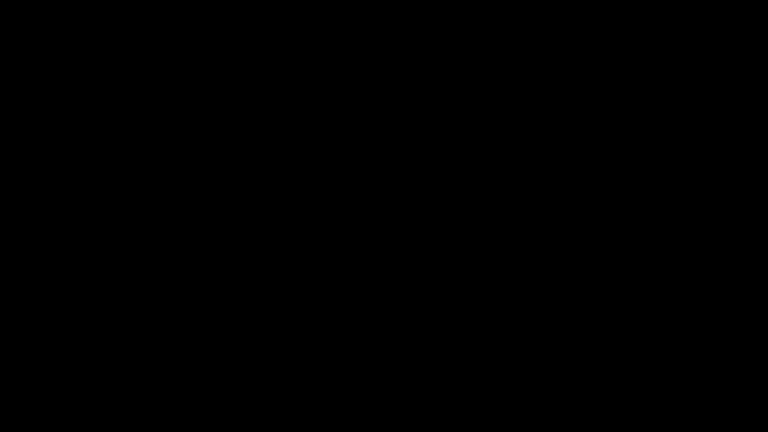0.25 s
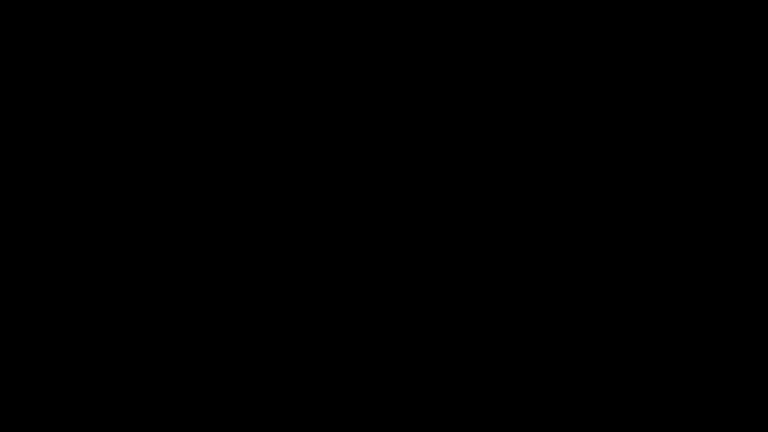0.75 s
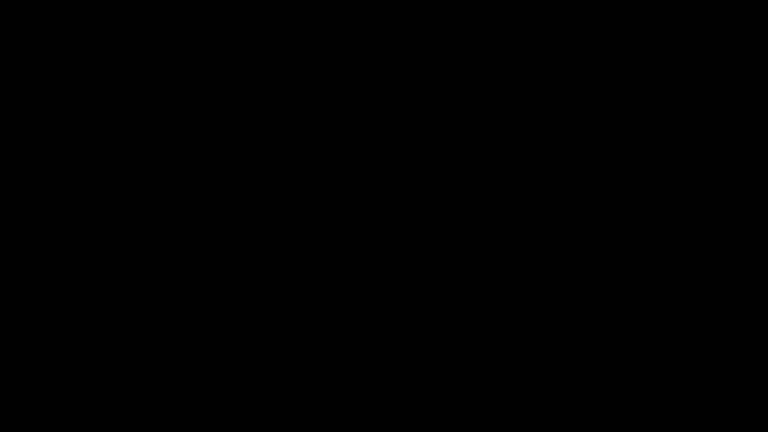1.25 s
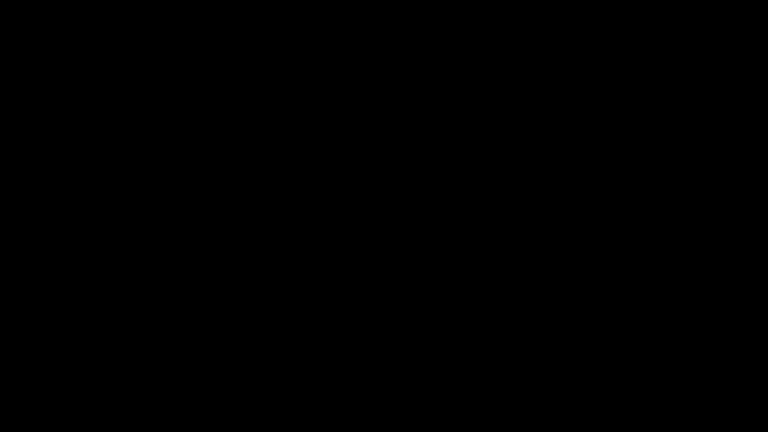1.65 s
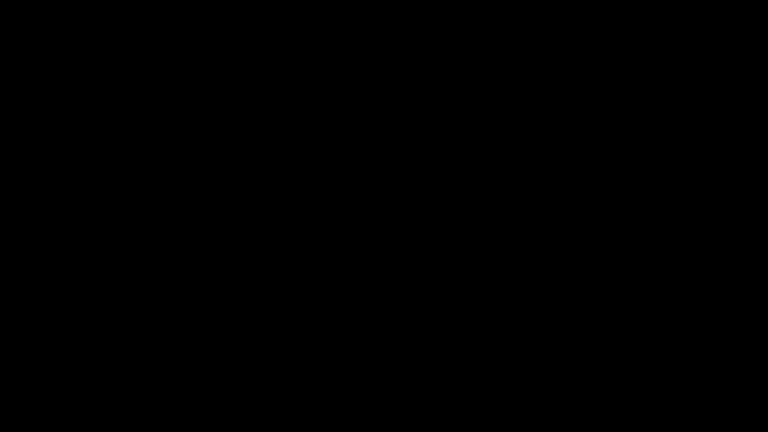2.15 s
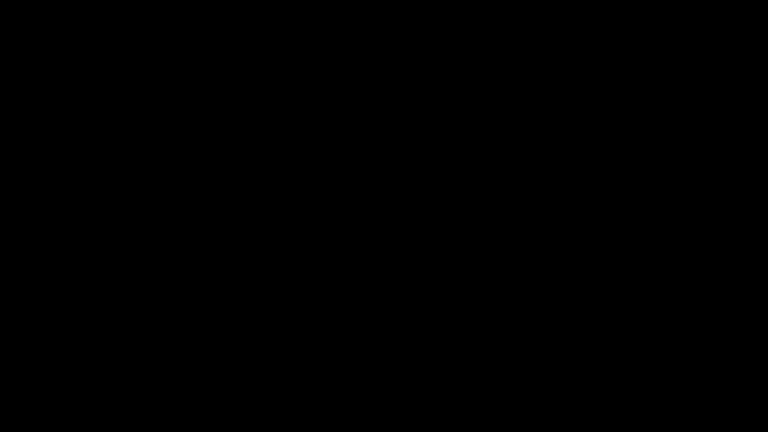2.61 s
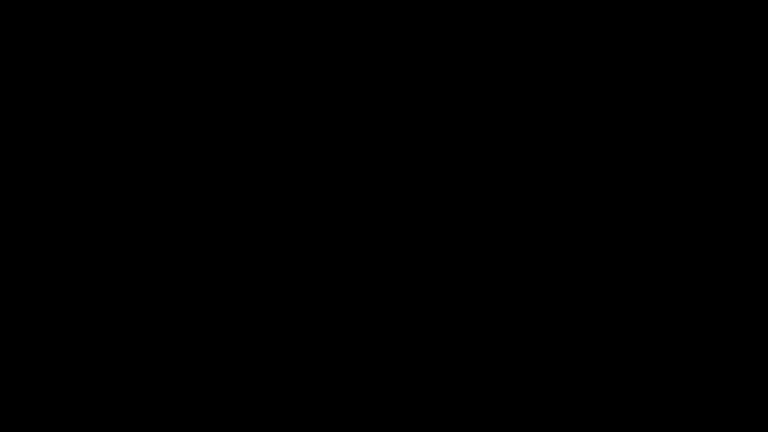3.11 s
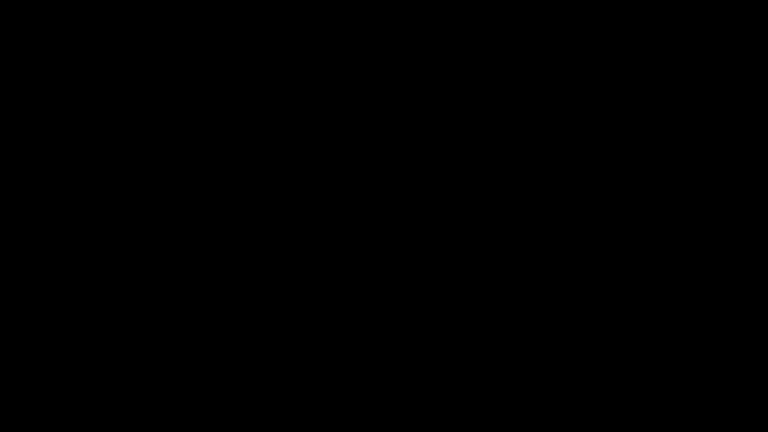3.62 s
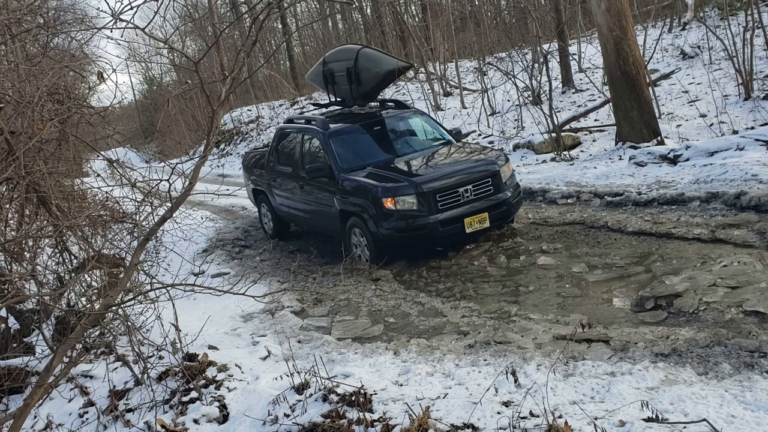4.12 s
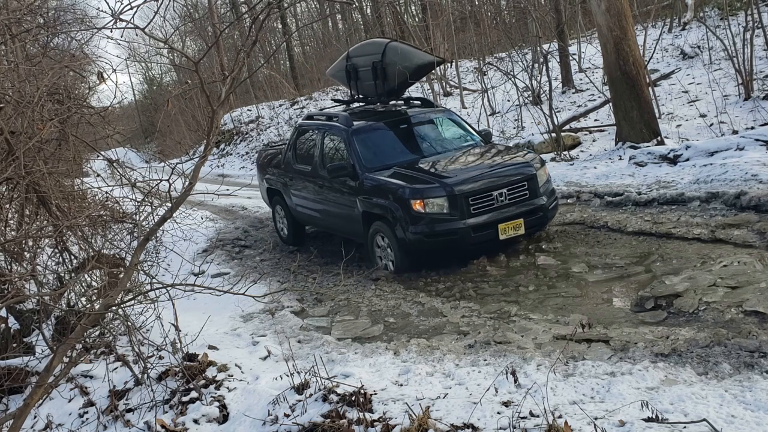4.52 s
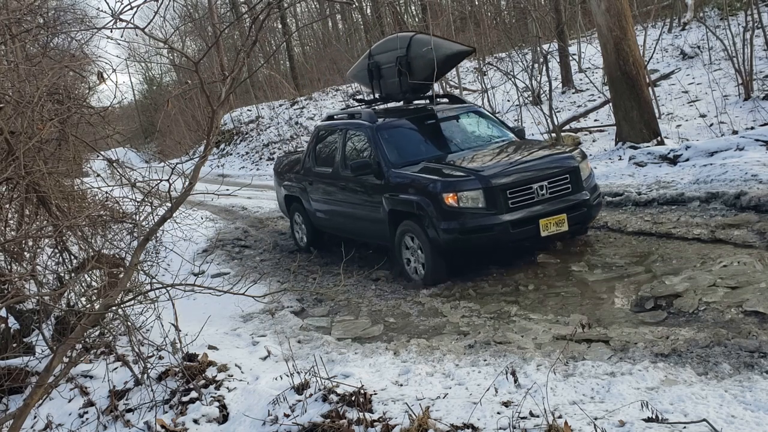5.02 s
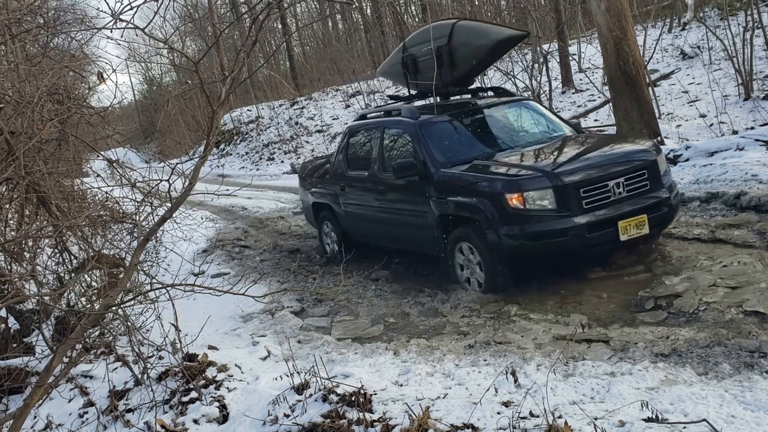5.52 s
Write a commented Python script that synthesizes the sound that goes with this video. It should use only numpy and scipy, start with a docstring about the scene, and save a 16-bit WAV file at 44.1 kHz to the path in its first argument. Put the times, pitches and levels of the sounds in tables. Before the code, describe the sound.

Outdoors on a snowy forest trail, a pickup rolls slowly through a frozen, muddy puddle. Quiet creaking ticks of ice come first, then clustered hollow knocks and crunching rubble, a brief lull, a sharp bright slab burst, more grinding, a dense heavy break, and finally sloshing splashes. Low rumble underneath. Close, dry stereo microphones, with a slight drift from left to right.

```python
"""Tyres grind ice rubble as dull knocks and sharp snaps ring out close to a microphone pair on a forest trail:
a pickup creeps through a frozen, muddy puddle, passing from left to right.
Ice plates knock with aftershocks, splinters snap as bright noise bursts, thin shards ping in a narrow band.
Clumped clicks and noise make rubble and slush, short rising rings make bubbles, noise puffs make splashes.
Engine and heavy body rumble underneath as low noise; a faint low hum swells and fades after heavy knocks."""
import sys
import numpy as np
from scipy import signal
from scipy.fft import rfft, irfft, next_fast_len
from scipy.io import wavfile
from scipy.ndimage import map_coordinates

SR = 44100
rng = np.random.default_rng(int(sys.argv[2]) if len(sys.argv) > 2 else 0)


def digitize_waveform(pressure):
    """Quantize a signal to 16-bit integers and store it at the path in sys.argv[1].

    Rows of a 2-D input are taken as channels; values are limited to [-1, 1].
    """
    field = np.atleast_2d(pressure).T
    bounded = np.clip(field, -1, 1)
    quanta = np.round(bounded * 32767).astype(np.int16)
    wavfile.write(sys.argv[1], SR, quanta)


N = 253575

# Tyre work. Each row: time in seconds, grinding of rubble in dB, slush hiss in dB.
TYRE_WORK = [(0.0, -52.5, -68), (0.34, -46, -62), (0.68, -53, -65.5), (0.76, -36.5, -55.5),
             (0.86, -46, -55.5), (1.0, -43.5, -53.5), (1.25, -42, -55.5), (1.75, -38, -52),
             (2.1, -44.5, -56.5), (2.17, -46.5, -61), (2.64, -38.5, -51.5), (2.99, -54, -52),
             (3.2, -46, -50), (3.4, -42, -49.5), (3.46, -41, -50), (3.84, -41.5, -46.5),
             (3.91, -31.5, -40.5), (4.53, -37, -39.5), (4.85, -39, -42), (5.29, -33, -37.5),
             (5.61, -31, -34), (5.75, -35, -35)]
# What the tyres work through. Each row: time in seconds, fine spray over slush hiss in dB,
# brittleness (gain of the upper rubble) in dB.
FOOTING_MAKEUP = [(0, -7.5, -1.5), (.6, -1, 0), (1.7, -3, -14), (2.3, -1.5, -12.5), (2.9, -6.5, 7),
                  (3.5, -6.5, -3), (4.3, -9, 1.5), (5.3, -11.5, -1), (5.75, -8.5, -4)]
# Splashes and thick slabs crushed under a wheel. Each row: start in seconds, length in seconds,
# grinding in dB, slush hiss in dB.
WHEEL_SURGES = [(2.886, 0.14, -80, -49.5), (3.24, 0.092, -24.5, -30), (3.375, 0.019, -41, -41),
                (4.534, 0.072, -19.5, -34.5), (4.603, 0.029, -36, -30.5), (4.659, 0.017, -22.5, -28),
                (5.248, 0.02, -55, -42), (5.465, 0.071, -38, -42.5), (5.703, 0.063, -40, -38)]
# Colour of ground rubble. Each row: frequency in Hz, relative level in dB per Hz.
RUBBLE_COLOUR = [(59, -10.5), (100, -5.5), (155, -3.5), (337, 3.5), (374, -2), (559, 0), (687, -2.5),
                 (1070, -1), (1740, -19), (2200, -25), (2860, -74), (4840, -120)]
# Colour of slush hiss. Each row: frequency in Hz, relative level in dB per Hz.
SLUSH_COLOUR = [(880, -8.5), (1500, -5.5), (1760, -16), (2500, -8.5), (3400, -13.5), (5000, -14),
                (7000, -19.5), (9000, -28.5)]
# Colour of fine spray. Each row: frequency in Hz, relative level in dB per Hz.
SPRAY_COLOUR = [(3000, -6), (6500, 0), (7800, 2), (9000, -1.5), (12000, -0.5), (16000, -3.5)]
# Engine and ground rumble. Each row: time in seconds, level in dB.
RUMBLE_LEVEL = [(0, -57.5), (.7, -54), (.96, -41), (1.2, -55), (1.8, -45), (2.1, -51), (3.0, -52),
                (3.28, -38), (3.8, -50), (3.92, -38), (5.0, -39.5), (5.75, -33.5)]
# Colour of the rumble. Each row: frequency in Hz, relative level in dB per Hz.
RUMBLE_COLOUR = [(13, -72), (22, -10), (70, 5.5), (200, -5), (260, -11), (440, -120)]
# Low hum swelling and fading after heavy knocks. Each row: start in seconds, nominal level in dB,
# fade in dB per second.
HUM_SWELLS = [(.96, -41, 35), (2.18, -52, 15)]
# Ice plates breaking. Each row: time in seconds, nominal level in dB, pitch in Hz,
# aftershocks relative to that level in dB.
PLATE_BREAKS = [(0.056, -42, 840, 6), (0.176, -35, 315, -6), (0.219, -28, 417, -6.5),
                (0.278, -37, 700, -15), (0.317, -32.5, 323, 4), (0.35, -33.5, 750, -0.5),
                (0.381, -30, 320, -8), (0.461, -30.5, 323, -10), (0.487, -31, 485, -7),
                (0.537, -34.5, 373, -7), (0.688, -33, 394, -0.5), (0.716, -35, 860, -2),
                (0.773, -27, 320, -7), (0.795, -27, 407, -13), (0.807, -20, 624, -10),
                (0.883, -15.5, 347, -7.5), (0.942, -10, 322, -11), (0.977, -19.5, 367, -8.5),
                (1.081, -30.5, 724, -3.5), (1.224, -29, 322, -11), (1.433, -18, 505, -5.5),
                (1.583, -25.5, 505, -22), (1.612, -29.5, 464, 7), (1.624, -12.5, 570, -6.5),
                (1.761, -25, 380, -23), (1.796, -23.5, 403, 3), (1.833, -25, 527, 2),
                (1.992, -19.5, 505, -4), (2.035, -19.5, 450, -6), (2.067, -29, 283, 1.5),
                (2.088, -26.5, 457, 1), (2.104, -28, 382, -1), (2.199, -19, 370, -5),
                (2.268, -27.5, 335, -1.5), (2.293, -24, 330, -4), (2.362, -27.5, 416, -10),
                (2.448, -22.5, 410, -0.5), (2.488, -31.5, 323, 4.5), (2.547, -31, 584, 3),
                (2.648, -41, 297, 9), (2.685, -35, 292, -6), (2.893, -30, 805, -8), (3.161, -36, 207, -7),
                (3.23, -18.5, 410, 0), (3.254, -10.5, 410, -7), (3.271, -9.5, 875, -7),
                (3.288, -14, 900, -11), (3.294, -27, 940, -11), (3.316, -15.5, 740, -5),
                (3.324, -12, 350, -4), (3.381, -18, 850, -2), (3.409, -25, 600, -5),
                (3.674, -24.5, 506, -2), (3.719, -12.5, 593, -26), (3.883, -18.5, 574, -6.5),
                (3.979, -10.5, 465, -11.5), (4.5, -26.5, 1010, 6), (4.541, -18, 490, -14),
                (4.559, -12.5, 720, -8), (4.584, -6, 510, -9), (4.593, -5.5, 700, -17),
                (4.615, -12, 450, -21), (4.624, -6, 900, -5), (4.669, -15, 690, -9),
                (4.675, -16.5, 930, -10), (4.768, -23, 640, 2), (5.18, -24.5, 590, 1.5),
                (5.19, -25, 444, -17), (5.683, -22, 432, -5), (5.722, -19, 595, 2)]
# Splinters snapping. Each row: time in seconds, nominal level in dB, fine spray over hiss in dB.
SPLINTER_SNAPS = [(0.088, -44, -13), (0.22, -51, 1), (0.352, -50, -1), (0.584, -48, 16), (0.772, -37.5, -7),
                  (0.807, -41, -10), (0.886, -37.5, -12), (0.949, -31, -5), (1.005, -38, -4),
                  (1.082, -56, -6), (1.226, -37, 1), (1.307, -41, 1), (1.344, -41, 0), (1.369, -35.5, -6),
                  (1.4096, -35, -3), (1.564, -43, -6), (1.615, -37, 3), (1.631, -30, -7), (1.68, -44, 16),
                  (1.798, -44, 13), (1.838, -32, 1), (1.864, -33, 3), (1.9403, -36.5, -14),
                  (1.993, -35.5, -4), (2.0677, -42.5, 12), (2.136, -42, -8), (2.201, -38, 0),
                  (2.2682, -36, -2), (2.293, -36.5, -1), (2.453, -42, -9), (2.482, -37.5, -6),
                  (2.887, -37, 19), (2.916, -37.5, 20), (3.168, -33.5, -7), (3.2326, -27.5, -13),
                  (3.2575, -39, -9), (3.272, -22, 7), (3.2874, -15.5, -2), (3.326, -19, 8),
                  (3.382, -22.5, 1), (3.898, -28, -9), (4.394, -30, -4), (4.544, -25.5, -17),
                  (4.584, -17, -10), (4.63, -19.5, -15), (4.705, -20, -6), (5.18, -27, -11),
                  (5.476, -34, -2)]
# Splashes thrown up by the tyres. Each row: time in seconds, nominal level in dB, pitch in Hz.
TYRE_SPLASHES = [(1.305, -41, 2680), (1.414, -42, 2830), (1.765, -43, 2820), (2.893, -38, 2730),
                 (2.95, -39, 2600), (3.292, -38, 2700), (4.884, -36, 2330), (5.035, -31, 2340),
                 (5.256, -31, 2920), (5.285, -29, 3180), (5.417, -25, 2460), (5.459, -22.5, 2450)]
# Thin shards that ping as a slab bursts. Each row: time in seconds, nominal level in dB.
SHARD_PINGS = [(3.233, -27), (3.258, -14), (3.383, -26)]
# Passage across the pair. Each row: time in seconds, lag of left behind right in samples.
LEFT_LAG = [(0, -5.5), (1.7, -3.5), (2.6, -0.5), (3.7, 2), (5.75, 5.5)]
# Sound common to both microphone ports. Each row: frequency in Hz, shared share of power.
PORT_LIKENESS = [(60, 0.94), (700, 0.99), (1300, 0.85), (2400, 0.38), (4400, 0.59), (8000, 0.19),
                 (15000, 0.16)]
# Difference in port colour. Each row: frequency in Hz, left minus right in dB.
PORT_COLOUR = [(60, 5), (200, 4.5), (600, 2.5), (1300, 4), (2400, -1), (4400, .5), (8000, 1), (15000, 0)]

BRITTLE_HZ = 800   # brittleness acts above this
BUBBLES_DB, GURGLE_DB = -17.5, -11   # relative to slush hiss, relative to grinding
SURGE_ATTACK_S, SURGE_SAG_DB, SURGE_RELEASE_S = 0.022, 3, 0.029
SURGE_FINE_DB = -8.5   # fine spray relative to slush hiss
HUM_HZ, HUM_ATTACK_S = 191, 0.094   # pitch about which the hum wavers
THUMP_HZ, THUMP_DB, THUMP_DB_PER_OCTAVE = 145.5, -13, -13   # ground push, stronger under deep plates
FRONT_HZ, FRONT_DB = 1026, -13.5   # brittle front of every break
RING_CYCLES, RING_S = 0.38, 0.00059   # small high plates swing a little more often
OVERTONE, OVERTONE_DB = 2.066, -15   # second swing, as a multiple of the plate's pitch
PLATE_TOP_HZ = 1370   # the plates give little above this
SNAP_S = 0.0056   # decay time
SPLASH_S, SPLASH_WIDTH = 0.0083, 0.14   # decay time; half bandwidth as a share of the pitch
SHARD_HZ, SHARD_HALF_WIDTH_HZ, SHARD_S = 6420, 450, 0.0009   # centre, half bandwidth, decay time
CUTOFF_HZ = 15830


def from_db(db):
    """Decibels to an amplitude factor."""
    return 10 ** (np.asarray(db) / 20)


def rms_one(x):
    """Scale to an rms of 1."""
    return x / np.sqrt(np.mean(x ** 2) + 1e-20)


def in_time(rows):
    """Join a table's rows by straight lines over time, one curve a column."""
    s, *columns = np.transpose(rows)
    return np.array([np.interp(np.arange(N) / SR, s, c) for c in columns])


def since(s):
    """Seconds elapsed since time s, zero before it."""
    return np.maximum(np.arange(N) / SR - s, 0)


def at_hz(points, hz):
    """Read a spectrum table along log frequency."""
    hz_points, values = np.transpose(points)
    return np.interp(np.log(hz), np.log(hz_points), values)


def filtered(x, gain_at):
    """Multiply each frequency by gain_at(Hz)."""
    size = 2 * next_fast_len(N // 2 + 1)
    hz = np.maximum(np.arange(size // 2 + 1) * SR / size, 1)
    return irfft(rfft(x, size) * gain_at(hz), size)[..., :N]


def coloured(streams, spectrum):
    """The spectrum on all streams, in minimum phase so that a click rings only after it; rms 1."""
    def causal(hz):
        cepstrum = irfft(np.log(from_db(at_hz(spectrum, hz))))
        # fold the cepstrum onto positive time
        cepstrum[1:len(hz) - 1] *= 2
        cepstrum[len(hz):] = 0
        return np.exp(rfft(cepstrum))
    return rms_one(filtered(streams, causal))


def add(out, s, sound):
    """Mix a sound in at time s, cut at the end."""
    at = min(max(round(s * SR), 0), N)
    out[..., at:at + sound.shape[-1]] += sound[..., :N - at]


def drift(rate):
    """Slow random wander of spread 1: noise through a two-pole lowpass near rate Hz."""
    pole = np.exp(-40 * np.pi * rate / SR)   # runs at every 20th sample
    noise = rng.standard_normal(N // 20 + 2002)
    slow = signal.lfilter([1], [1, -2 * pole, pole * pole], noise)[2000:]
    return np.interp(np.arange(N) / 20, np.arange(len(slow)), rms_one(slow))


def grains(per_s, spread_db, clump_db, clump_rate, smooth):
    """Three unrelated streams of random clicks that come in shared clumps, on a share of smooth noise."""
    clumps = from_db(clump_db * drift(clump_rate) + .5 * clump_db * drift(4 * clump_rate))
    sizes = from_db(spread_db * np.minimum(rng.exponential(1, (3, N)), 5))
    signs = rng.choice([-1, 1], (3, N))
    clicks = sizes * signs * (rng.random((3, N)) < per_s / SR)
    return (rms_one(clicks) + smooth * rng.standard_normal((3, N))) * clumps


def ground_rubble(brittle_db):
    """Broken ice ground under the tyres: clumped clicks, their upper part raised where it is brittle."""
    clicks = grains(per_s=1200.0, spread_db=3.5, clump_db=1.9, clump_rate=8.9, smooth=0.71)
    rubble = coloured(clicks, RUBBLE_COLOUR)
    dull = signal.sosfilt(signal.butter(2, BRITTLE_HZ, fs=SR, output="sos"), rubble)
    return dull + from_db(brittle_db) * (rubble - dull)


def pushed_slush(slush, fine):
    """Slush shoved aside: dense clumped drops, coloured once as hiss and once as fine spray."""
    drops = grains(per_s=4000.0, spread_db=3.5, clump_db=1.36, clump_rate=13.2, smooth=0.85)
    return slush * coloured(drops, SLUSH_COLOUR) + fine * coloured(drops, SPRAY_COLOUR)


def patchy(streams, depth_db, rate):
    """Overlapping half-octave bands from 1 kHz up swell and thin out each on its own; the end bands are open."""
    def share(k):
        return lambda hz: np.maximum(1 - np.abs(np.clip(2 * np.log2(hz / 1000), 0, 8) - k), 0)
    return sum(from_db(depth_db * drift(rate)) * filtered(streams, share(k)) for k in range(9))


def bubbles(per_s, low_hz, high_hz, cycles, rise):
    """Small air pockets burst at random, each a short ring that rises in pitch; rms 1."""
    out, chance = np.zeros(N), rng.random((4000, 3))
    for when, pitch, size in chance[:int(per_s * N / SR)]:
        hz = low_hz * (high_hz / low_hz) ** pitch
        age = np.arange(int(4 * cycles * SR / hz)) * hz / SR   # in cycles
        swell = age * np.exp(-2 * age / cycles)
        ring = np.sin(2 * np.pi * age * (1 + rise * age / cycles))
        add(out, when * N / SR, from_db(-14 * size) * swell * ring)
    return rms_one(out)


def rumble_and_hum():
    """Engine and heavy body as lumpy low rumble, and a wavering low hum after heavy knocks."""
    level_db = in_time(RUMBLE_LEVEL)[0] + 0.28 * drift(6.3)
    rumble = from_db(level_db) * coloured(rng.standard_normal((3, N)), RUMBLE_COLOUR)
    turns = np.cumsum(HUM_HZ * (1 + 0.011 * drift(6.5))) / SR
    swell = np.zeros(N)
    for s, level_db, fade_db in HUM_SWELLS:
        rise = np.minimum(since(s) / HUM_ATTACK_S, 1)
        swell += from_db(level_db - fade_db * since(s)) * rise
    return rumble + swell * np.sin(2 * np.pi * turns)


def knock(hz, cycles):
    """A plate gives way: a short push, a deep recoil, a quick end, falling in pitch; peak 1."""
    age = np.arange(int(8 * SR / hz)) * hz / SR   # in cycles
    turns = age + 0.012 * (1 - np.exp(-age / .5))
    swing = (age / cycles) ** 2 * np.exp(-2 * age / cycles) * np.sin(2 * np.pi * turns)
    return swing / np.max(np.abs(swing))


def cracks():
    """Each break is a knock with overtone, low push and brittle front, then nine fading ones as pieces settle."""
    out = np.zeros((3, N))
    chance = rng.random((len(PLATE_BREAKS), 3, 9))
    for (s, level_db, hz, after_db), (when, size, pitch) in zip(PLATE_BREAKS, chance):
        thump_db = THUMP_DB + THUMP_DB_PER_OCTAVE * np.log2(hz / 400)
        add(out, s + 0.001836, from_db(level_db) * knock(hz, cycles=RING_CYCLES + RING_S * hz))
        add(out, s + 0.00184, from_db(level_db + FRONT_DB) * knock(FRONT_HZ, cycles=0.89))
        add(out, s + 0.0011, from_db(level_db + thump_db) * knock(THUMP_HZ, cycles=0.423))
        add(out, s + 0.002416, from_db(level_db + OVERTONE_DB) * knock(OVERTONE * hz, cycles=1.42))
        for k in range(9):
            delay = 0.003627 + 0.0027 * (k + when[k])
            piece_db = level_db + after_db - 380 * delay - 7 * size[k]   # fades 380 dB per second
            piece = knock(hz * (.75 + .9 * pitch[k]), cycles=0.77)
            add(out, s + delay, from_db(piece_db) * piece * (-1) ** k)
    return signal.sosfilt(signal.butter(4, PLATE_TOP_HZ, fs=SR, output="sos"), out)


def snaps():
    """Splinters: short bursts of bright noise with a sharp front, each with its own share of fine spray."""
    hiss, fine = np.zeros((2, N))
    age = np.arange(int(.06 * SR)) / (SR * SNAP_S)   # in decay times
    for s, level_db, fine_db in SPLINTER_SNAPS:
        burst = from_db(level_db - 7.0) * np.exp(-age) * np.minimum(age * 3, 1)
        add(hiss, s, burst * from_db(-.5 * fine_db))
        add(fine, s, burst * from_db(.5 * fine_db))
    noise = rng.standard_normal((3, N))
    return coloured(noise, SLUSH_COLOUR) * hiss + coloured(noise, SPRAY_COLOUR) * fine


def splashes():
    """Thrown water: a puff of noise in a narrow band, quick to rise and dying fast."""
    out = np.zeros((3, N))
    age = np.arange(int(.1 * SR)) / (SR * SPLASH_S)   # in decay times
    for s, level_db, hz in TYRE_SPLASHES:
        edges = [hz * (1 - SPLASH_WIDTH), hz * (1 + SPLASH_WIDTH)]
        band = signal.butter(2, edges, "band", fs=SR, output="sos")
        puff = rms_one(signal.sosfilt(band, rng.standard_normal((3, len(age)))))
        add(out, s, from_db(level_db - 4) * puff * np.exp(-age) * np.minimum(age * 4, 1))
    return out


def surges():
    """Each rises fast, sags while the wheel bears down and dies quickly; gains for grinding, slush and spray."""
    out = np.zeros((3, N))
    for s, length, grind_db, slush_db in WHEEL_SURGES:
        attack = np.minimum(since(s) / SURGE_ATTACK_S, 1)
        held = from_db(-SURGE_SAG_DB * np.minimum(since(s) / length, 1))
        release = np.exp(-since(s + length) / SURGE_RELEASE_S)
        out += from_db([[grind_db], [slush_db], [slush_db + SURGE_FINE_DB]]) * attack * held * release
    return out


def shards():
    """Thin ice pings: very short decaying bursts of noise in one high band."""
    bursts = np.zeros(N)
    for s, level_db in SHARD_PINGS:
        bursts += from_db(level_db) * (since(s) > 0) * np.exp(-since(s) / SHARD_S)
    edges = [SHARD_HZ - SHARD_HALF_WIDTH_HZ, SHARD_HZ + SHARD_HALF_WIDTH_HZ]
    band_filter = signal.butter(2, edges, "band", fs=SR, output="sos")
    band = signal.sosfilt(band_filter, rng.standard_normal((3, N)))
    return bursts * rms_one(band)


def tyres():
    """Tyres working the puddle: rubble and gurgle follow the grinding, hiss and fizz follow the slush."""
    grind_db, slush_db = in_time(TYRE_WORK)
    fine_db, brittle_db = in_time(FOOTING_MAKEUP)
    grind, slush, fine = from_db([grind_db, slush_db, slush_db + fine_db]) + surges()
    rubble = ground_rubble(brittle_db)
    wet = pushed_slush(slush, fine) + snaps()
    fizz = bubbles(per_s=130.0, low_hz=1906, high_hz=5980, cycles=9.5, rise=0.043)
    gurgle = bubbles(per_s=120.0, low_hz=249.3, high_hz=1261, cycles=5.4, rise=0.027)
    grinding = grind * (rubble + from_db(GURGLE_DB) * gurgle)
    fizzing = slush * from_db(BUBBLES_DB) * fizz
    return grinding + patchy(wet, depth_db=0.76, rate=7.6) + fizzing + splashes()


def two_ports(streams):
    """Stream 0 reaches both ports, the left ever later as the pickup crosses; 1 and 2 are scattered, one a port."""
    def likeness(hz):
        return np.clip(at_hz(PORT_LIKENESS, hz), 0, 1)
    shared = filtered(streams[0], lambda hz: np.sqrt(likeness(hz)))
    apart = filtered(streams[1:], lambda hz: np.sqrt(1 - likeness(hz)))
    left_times = np.arange(N) - in_time(LEFT_LAG)[0]
    left = map_coordinates(shared, [left_times], order=5, mode="nearest")
    return np.array([left, shared]) + apart


def scene():
    """Tyres, rumble and hum, breaking plates and shards as they reach the microphone pair."""
    return two_ports(tyres() + rumble_and_hum() + cracks() + shards())


def record(dry):
    """The two ports differ in colour; peaks are rounded, the deep bass and the top are cut."""
    ports = filtered(dry, lambda hz: from_db(at_hz(PORT_COLOUR, hz) * [[.5], [-.5]]))
    rounded = np.tanh(ports)
    lean = signal.sosfilt(signal.butter(3, 42.0, "high", fs=SR, output="sos"), rounded)
    return filtered(lean, lambda hz: hz < CUTOFF_HZ)


dry = scene()
out = record(dry)
digitize_waveform(out)
```